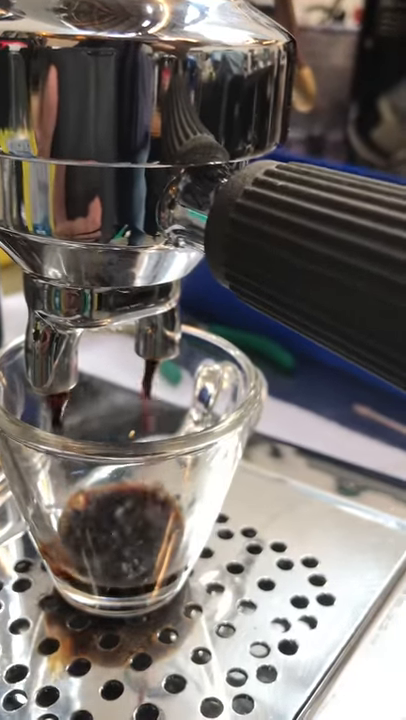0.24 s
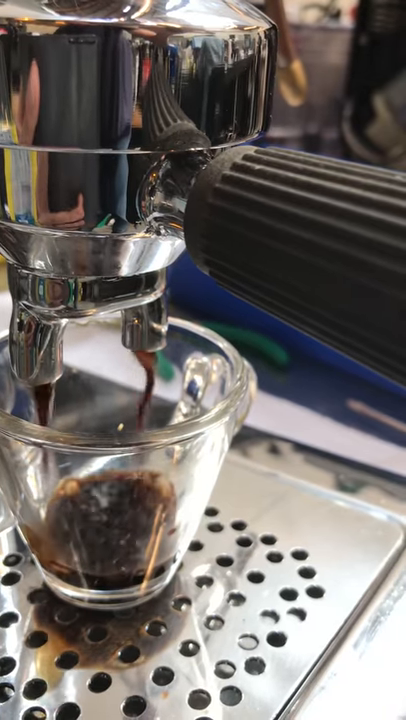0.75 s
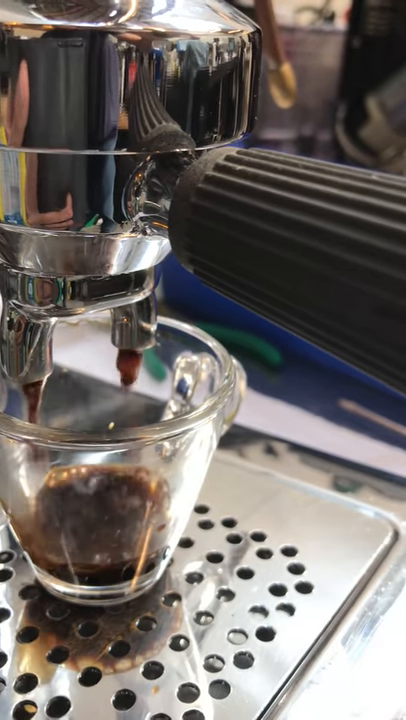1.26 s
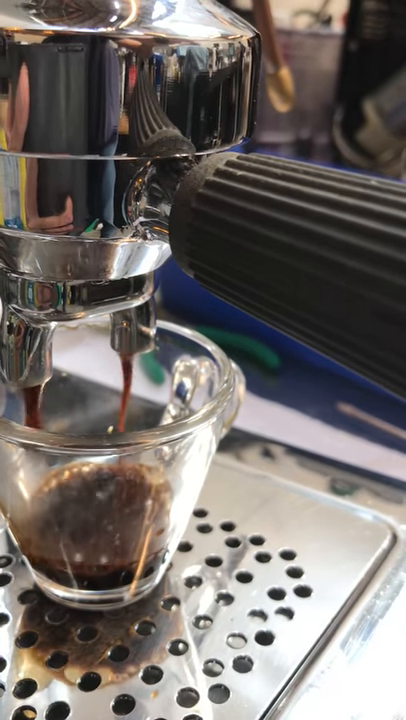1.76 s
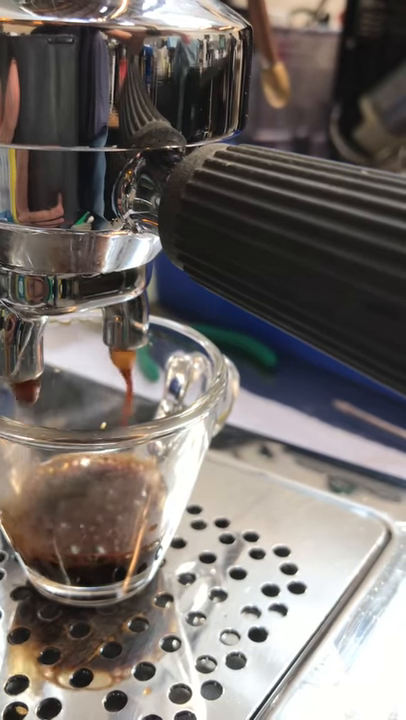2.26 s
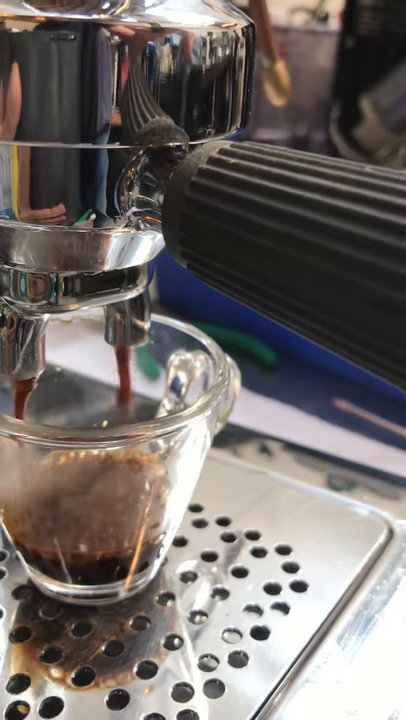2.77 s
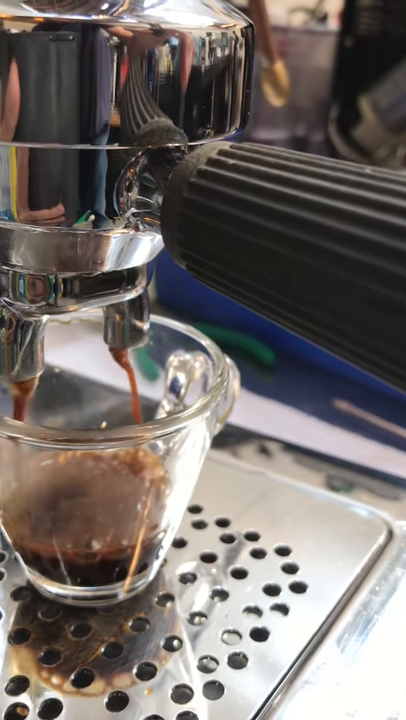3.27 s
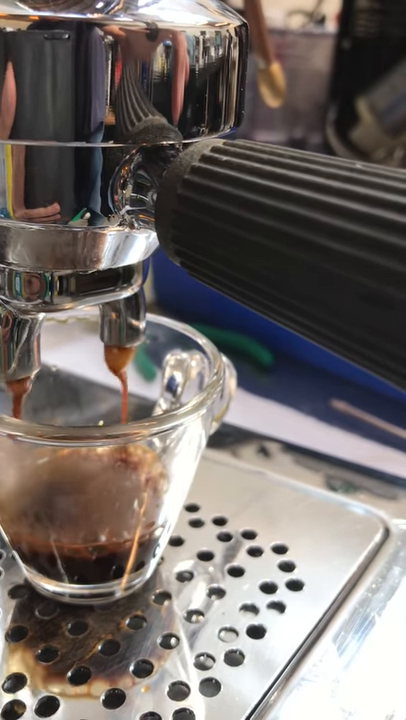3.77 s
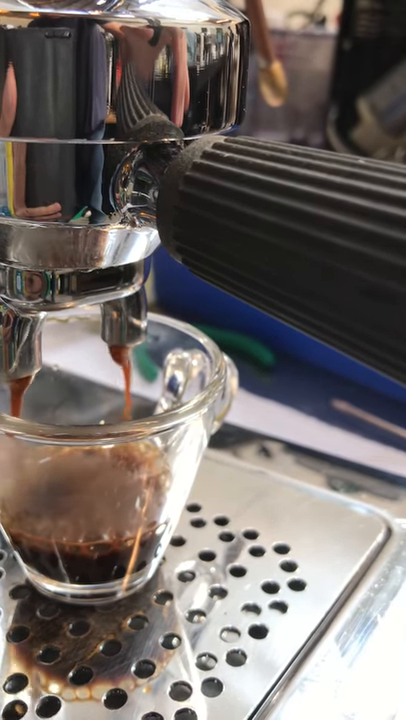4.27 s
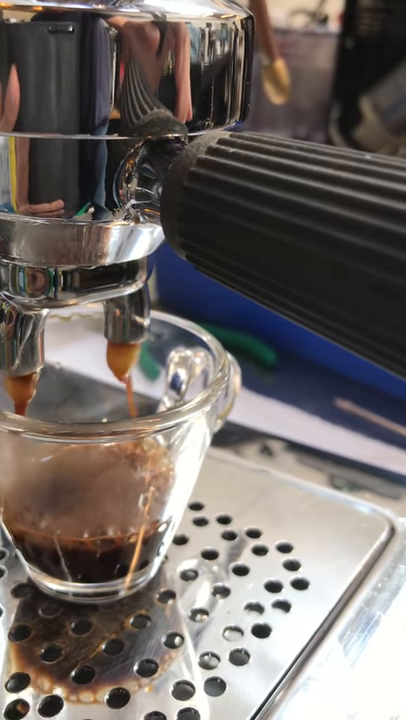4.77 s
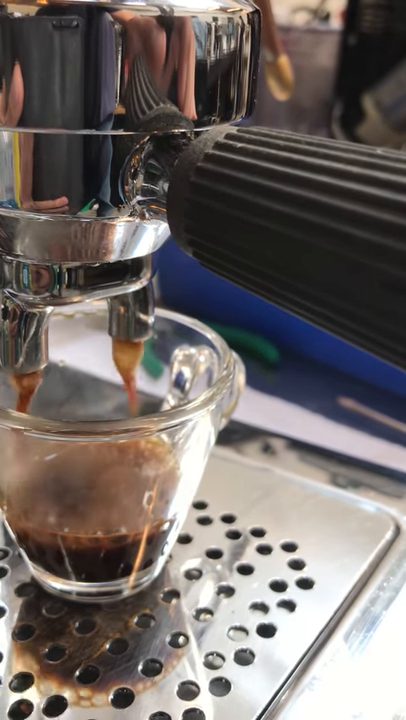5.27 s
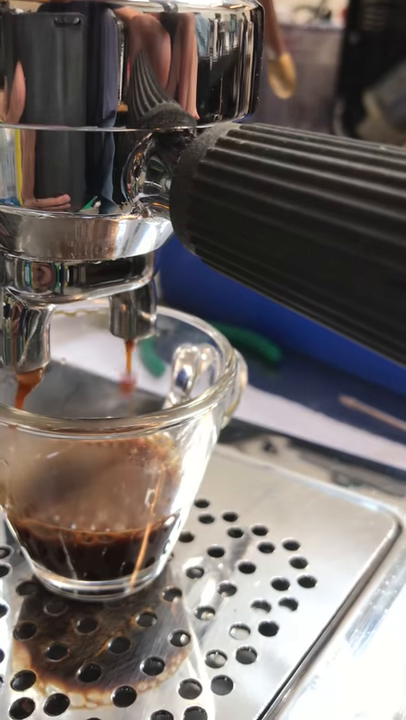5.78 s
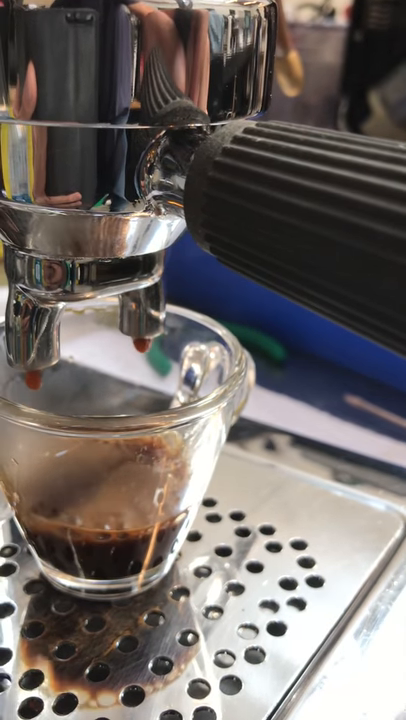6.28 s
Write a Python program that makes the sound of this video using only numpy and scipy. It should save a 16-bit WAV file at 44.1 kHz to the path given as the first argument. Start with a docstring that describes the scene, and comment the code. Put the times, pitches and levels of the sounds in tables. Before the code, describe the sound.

Espresso trickles into a glass cup close to a mono microphone, heard as tiny high pips and ticks of bursting foam bubbles over a soft fizz. The popping runs throughout and is sharpest in the first second and a half. Further off in the workshop, a spray hisses three times in quick succession, at the very start, at about 0.3 and at 0.6 seconds, leaving a thin, fading whistle. At about 1.7 seconds something heavy is knocked down on a bench, a thud with a short metallic ring and a little room echo. The foam sputters softly around 2.5 seconds, gives a clearer pop near 3.2, then slowly calms. A quiet low rumble and machine drone lie underneath, and a faint distant whir swells at about 5 and 6.3 seconds.

```python
"""Bubbles burst in the crema as espresso trickles into a glass cup, close to a mono microphone. Each film
snaps and its cavity rings as a tiny pip or tick; small bubbles crowd around the big ones and the foam
slowly calms. Further off in the workshop a spray hisses three times and something heavy is knocked down
on a bench, ringing its modes. The room rumbles quietly throughout; a faint whir swells twice at the end."""
import sys
import numpy as np
from scipy import signal
from scipy.fft import rfft, irfft, next_fast_len
from scipy.io import wavfile
from scipy.ndimage import map_coordinates

SR = 44100
rng = np.random.default_rng(int(sys.argv[2]) if len(sys.argv) > 2 else 0)


def pcm_store(signal):
    """Save signal as 16-bit PCM."""
    levels = np.round(np.clip(np.atleast_2d(signal), -1, 1) * 32767)
    wavfile.write(sys.argv[1], SR, levels.astype(np.int16).T)


N = 287973
TIME_S = np.arange(N) / SR
TOP_HZ = 16000


def amp(db):
    """Decibels to gain."""
    return 10 ** (np.asarray(db) / 20)


def unit(x):
    """Scale to rms 1."""
    return x / np.sqrt(np.mean(x ** 2) + 1e-20)


def along(points, hz):
    """Read (Hz, value) points on a log frequency axis."""
    knots_hz, values = np.transpose(points)
    return np.interp(np.log(hz + 1), np.log(knots_hz + 1), values)


def wobble(rate_hz):
    """Smooth random curve, rate_hz knots a second."""
    knots = rng.standard_normal(int(N * rate_hz / SR) + 4)
    return map_coordinates(knots, [TIME_S * rate_hz])


def filtered(x, response):
    """Apply a gain given as a function of Hz."""
    size = next_fast_len(N + SR // 2)
    return irfft(rfft(x, size) * response(np.fft.rfftfreq(size, 1 / SR)), size)[:N]


def noise(spectrum):
    """Noise of rms 1 with a (Hz, dB) colour."""
    return unit(filtered(rng.standard_normal(N), lambda hz: amp(along(spectrum, hz))))


def resonant_noise(peaks):
    """Noise of rms 1 through (Hz, width Hz, dB) resonances of alternating sign."""
    def response(hz):
        return sum((-1) ** k * amp(db) * 1j * hz * width / (centre ** 2 - hz ** 2 + 1j * hz * width)
                   for k, (centre, width, db) in enumerate(peaks))
    return unit(filtered(rng.standard_normal(N), response))


def place(start_s, sounds):
    """Sum rows of samples, each from its start time."""
    index = np.round(np.abs(start_s) * SR).astype(int)[:, None] + np.arange(sounds.shape[1])
    return np.bincount(index.ravel(), sounds.ravel(), N)[:N]


def sized(sounds, db):
    """Give each row the energy of 5 ms at its level."""
    energy = np.sum(sounds ** 2, 1, keepdims=True)
    return sounds * amp(db)[:, None] / np.sqrt(energy / (0.005 * SR) + 1e-20)


# Wall reverberation. Each row: frequency in Hz, T60 in seconds.
WALL_DECAY = [(80, 0.89), (300, 0.62), (900, 0.88), (2500, 0.85), (6000, 0.68), (10000, 0.46),
              (16000, 0.43)]

def room(x, wet_db):
    """Add the workshop's tail, 5 ms late; treble dies soonest."""
    hz, t, spectra = signal.stft(rng.standard_normal(SR), SR, nperseg=256)
    decay = amp(-60 * t / along(WALL_DECAY, hz)[:, None])
    tail = signal.istft(spectra * decay, SR, nperseg=256)[1]
    tail = np.pad(tail / np.linalg.norm(tail), (SR // 200, 0))
    return x + amp(wet_db) * signal.fftconvolve(x, tail)[:N]


# Room noise. Each row: frequency in Hz, relative density in dB.
AIR_SPECTRUM = [(12, -26), (20, 3.5), (43, 2.5), (123, 2), (177, -8.5), (222, -6.5), (446, -15),
                (759, -20.5), (923, -20), (1150, -22), (1660, -23), (2820, -28), (4670, -28.5), (5080, -30),
                (16000, -39.5)]
# Machine drone. Each row: centre in Hz, width in Hz, relative gain in dB.
DRONE_PEAKS = [(90.2, 26, -3.5), (131, 31.8, 0.5), (232.6, 30.7, -4), (376, 17, -11.5), (598.7, 14, -15),
               (954, 46, -16), (1326, 8.2, -17), (1440, 4.3, -12), (1720, 6.5, -13)]
# Far whir. Each row: peak time in seconds, level in dB, slope either side in dB per second.
WHIR_SWELLS = [(4.98, -68, 75), (6.35, -65, 130)]

def workshop():
    """Steady room noise, a wavering machine drone and a far whir that swells twice."""
    waver = amp(0.8 * wobble(rate_hz=3))
    swells = sum(amp(db - slope * np.abs(TIME_S - peak_s)) for peak_s, db, slope in WHIR_SWELLS)
    whir = (amp(-79) + swells) * resonant_noise([(915, 86, 0)])
    air = amp(-54.5) * noise(AIR_SPECTRUM)
    drone = amp(-58.5) * waver * resonant_noise(DRONE_PEAKS)
    return air + drone + whir


def pip(t, hz, cycles, glide, linger_db):
    """An opened bubble rings a few cycles, then faintly on, rising in pitch as its cavity shrinks."""
    age_cycles = hz[:, None] * t
    life_cycles = np.maximum(cycles, 1)[:, None]
    rise = glide * rng.uniform(0.8, 1, (len(hz), 1))
    pitch_hz = hz[:, None] * (1 + rise * np.tanh(np.maximum(age_cycles - life_cycles, 0) / 38))
    attack = 1 - np.exp(-(age_cycles / (0.28 * life_cycles)) ** 2)
    fade = np.exp(-(age_cycles / life_cycles) ** 2) + amp(linger_db) * np.exp(-age_cycles / 17)
    return attack * fade * np.sin(2 * np.pi * np.cumsum(pitch_hz, 1) / SR)


# Tearing film. Each row: frequency in Hz, gain in dB.
SNAP_SPECTRUM = [(1500, -28), (3000, -6), (4500, 14.5), (8000, 4), (12000, 1), (16000, -2)]

def bursts(start_s, hz, db, cycles, upper_hz, upper_db):
    """Each film snaps and rings two cavity modes; cup and machine scatter the tones back."""
    t = np.arange(SR // 30) / SR
    linger_db = np.interp(hz, [2500, 4200], [-16, -31])[:, None]  # deep bubbles chirp on longest
    tones = sized(pip(t, hz, 1.3 * cycles, glide=0.7, linger_db=linger_db), db)
    tones += sized(pip(t, upper_hz, 0.92 * cycles, glide=0.09, linger_db=-25), upper_db)
    snap_db = upper_db - 6 + 6 * np.log2(upper_hz / 7500)
    snaps = sized(rng.standard_normal(tones.shape) * t * np.exp(-t / 0.00068), snap_db)
    snaps = filtered(place(start_s, snaps), lambda f: amp(along(SNAP_SPECTRUM, f)))
    scatter = rng.standard_normal(tones.shape) * np.exp(-t / 0.0035) * (t > 0.001)
    scatter /= np.linalg.norm(scatter, axis=1, keepdims=True)
    echoes = signal.fftconvolve(tones, scatter, axes=1)[:, :len(t)]
    return place(start_s, tones + amp(-9) * echoes) + snaps


def small_bursts(start_s, hz, db, cycles):
    """Small bubbles: a weak upper mode at a set ratio above the cavity pitch."""
    upper_hz = np.minimum(1.7 * hz, TOP_HZ)
    return bursts(start_s, hz, db, np.full(len(start_s), cycles), upper_hz, upper_db=db - 16)


def bubble_pairs(activity_db, pairs, centre_hz, log_spread, offset_db, spread_db, cycles):
    """Small bubbles burst in pairs, louder and more often while the foam is busy."""
    due = np.cumsum(amp(activity_db))
    quantiles = (np.arange(pairs) + rng.uniform(0, 1, pairs)) / pairs
    pair_s = np.interp(quantiles, due / due[-1], TIME_S)
    start_s = (pair_s[:, None] + np.cumsum(rng.exponential(0.01, (pairs, 2)), 1)).ravel()
    pitch_draw, level_draw = rng.standard_normal((len(start_s), 2)).T
    hz = np.minimum(centre_hz * np.exp(log_spread * pitch_draw), SR / 3)
    db = np.interp(start_s, TIME_S, activity_db) + offset_db + spread_db * np.tanh(level_draw)
    return small_bursts(start_s, hz, db, cycles)


# Foam activity before stirring. Each row: time in seconds, level in dB.
FOAM_TREND = [(0, -61), (0.8, -56), (1.0, -63), (2.201, -60), (2.7, -60), (3.0, -64), (3.4, -60.5),
              (5.3, -60), (6.5, -66)]

def foam_activity_db(pops, max_stir_db=5, reach_s=0.04, full_kick_db=-50):
    """The foam drifts slowly in level and is stirred up around each big burst."""
    start_s, _, cavity_db = np.transpose(pops)[:3]
    kicks = place(start_s, np.minimum(amp(cavity_db - full_kick_db), 1)[:, None])
    stir = signal.fftconvolve(kicks, signal.windows.gaussian(SR, reach_s * SR), "same")
    return np.interp(TIME_S, *np.transpose(FOAM_TREND)) + max_stir_db * np.tanh(stir)


# Big bubbles. Each row: start in seconds, cavity pitch in Hz, cavity level in dB,
# nominal ring length in cycles, upper mode in Hz, upper mode level in dB.
BIG_POPS = [(0.124, 3900, -39, 6.5, 9710, -55), (0.236, 2860, -37.5, 3.3, 4040, -39),
            (0.306, 4730, -41.5, 3.9, 12400, -47), (0.3306, 2570, -35, 3.6, 3750, -43),
            (0.521, 3600, -41, 1.9, 8000, -63), (0.5706, 4140, -32.5, 4.6, 11700, -52),
            (0.5853, 4370, -32.5, 8.8, 8500, -47), (0.9776, 4420, -46, 5.5, 11410, -54.5),
            (1.0469, 4420, -46, 5.4, 8760, -76), (1.0944, 4400, -68, 4, 8050, -57.5),
            (1.1423, 4260, -38, 5, 5530, -42), (1.2283, 3920, -41, 2.2, 7020, -56),
            (1.3133, 2360, -36, 2.6, 6200, -41.5), (1.3639, 5620, -43.5, 3.7, 9990, -81.5),
            (1.3849, 3740, -49.5, 3.1, 5860, -71), (1.5424, 4360, -43.5, 1.75, 7060, -69),
            (1.635, 3500, -52, 1.3, 6760, -53.5), (1.6548, 4650, -44, 2.1, 7990, -63),
            (1.6913, 2400, -52.5, 2.8, 4100, -53.5), (1.9153, 3540, -54.5, 4.6, 11500, -48),
            (2.1418, 2870, -46.5, 7.1, 4850, -47.5), (2.2707, 5010, -44.5, 6.2, 8000, -43.5),
            (2.3122, 4440, -52, 6, 6780, -78.5), (2.3328, 3900, -52.5, 4.6, 6460, -77),
            (2.5924, 4600, -51, 7.6, 6800, -73), (2.7132, 5830, -51, 3, 8380, -50.5),
            (2.744, 4520, -52.5, 2.8, 8400, -61), (2.7868, 3750, -55, 4.7, 6460, -61.5),
            (2.8008, 4760, -69.5, 5.3, 8600, -52), (2.823, 4340, -48.5, 7, 6440, -73),
            (2.875, 4470, -76.5, 4.2, 6800, -62), (2.9558, 4100, -46.5, 1.8, 6800, -55),
            (3.1176, 3980, -46.5, 2.5, 8700, -60.5), (3.158, 4370, -72, 4, 11200, -59),
            (3.2121, 4400, -38, 4.1, 11100, -53), (3.2326, 3960, -50.5, 4.5, 5730, -65),
            (3.2385, 4700, -45.5, 4.1, 7960, -46.5), (3.3819, 4460, -47.5, 2.1, 7210, -65),
            (3.4649, 6160, -52.5, 4.6, 8200, -58), (3.5285, 4450, -48, 4.7, 6900, -58),
            (3.7516, 4230, -60, 9.4, 10800, -61.5), (4.1411, 4170, -57.5, 3.9, 7710, -60.5),
            (4.3013, 2980, -55.5, 3.7, 6700, -51.5), (4.5423, 2300, -71, 7.9, 11930, -60.5),
            (4.565, 2200, -48.5, 2.6, 7100, -60), (4.9447, 4770, -49.5, 4.1, 7600, -51.5),
            (5.2215, 4660, -48, 6.1, 6300, -58.5), (5.4337, 4270, -67, 3.7, 6930, -60),
            (5.5956, 4350, -47.5, 5.5, 7650, -55.5), (5.6959, 4710, -45, 5.2, 7280, -68),
            (6.2904, 3270, -58, 3.3, 7700, -52.5)]

def crema():
    """Foam in the cup: clear pops, bubble runs, small pips, finer ticks and a soft fizz."""
    activity_db = foam_activity_db(BIG_POPS)
    pips = bubble_pairs(activity_db, pairs=120, centre_hz=4350, log_spread=0.12,
                        offset_db=-7, spread_db=5.5, cycles=4.5)
    ticks = bubble_pairs(activity_db, pairs=160, centre_hz=7900, log_spread=0.27,
                         offset_db=-11, spread_db=5, cycles=3.2)
    fizz = noise([(1500, 0.5), (4300, -8), (8000, -11), (10500, -21), (16000, -15)])
    pops = bursts(*np.transpose(BIG_POPS))
    return room(pops + bubble_runs() + pips + ticks, wet_db=-22) + amp(activity_db - 9.5) * fizz


# Spray flow. Each row: start, rise, hold and fall T60 in seconds, level in dB.
SQUIRTS = [(0.02, 0.05, 0.018, 0.18, -37.5), (0.326, 0.055, 0.015, 0.2, -42.5),
           (0.551, 0.035, 0.037, 0.24, -35)]
# Mist hiss. Each row: frequency in Hz, relative density in dB.
MIST_SPECTRUM = [(710, -46), (1200, -21), (1630, -18.5), (2270, -9.5), (2480, -6), (3620, -3.5), (3950, 3),
                 (4960, -4), (6030, 0.5), (7490, -9), (8630, 1.5), (10500, -0.5), (11300, -4), (15200, -7),
                 (16000, -16)]
# Nozzle and whistle resonances. Each row: centre in Hz, width in Hz, relative gain in dB.
NOZZLE_PEAKS = [(2330, 160, 3), (3890, 270, -2), (6020, 130, 3), (8380, 120, 4.5), (8660, 120, -3),
                (9250, 150, -6)]
WHISTLE_PEAKS = [(2520, 320, -4.5), (6310, 130, 4), (12600, 420, -7)]

def spray(whistle_db=-58, whistle_hold_s=0.35, whistle_fall_db_per_s=38):
    """Each squirt swells, holds and dies; a thin whistle carries on and the hiss lingers in the room."""
    flow = np.zeros(N)
    for start_s, rise_s, hold_s, t60_s, db in SQUIRTS:
        t = TIME_S - start_s
        attack = np.clip(t / rise_s, 0, 1) ** 1.1
        flow += attack * amp(db - 60 * np.maximum(t - rise_s - hold_s, 0) / t60_s)
    fall_db = whistle_fall_db_per_s * np.maximum(TIME_S - whistle_hold_s, 0)
    whistle = amp(whistle_db - fall_db) * resonant_noise(WHISTLE_PEAKS)
    hiss = noise(MIST_SPECTRUM) + amp(-12.5) * resonant_noise(NOZZLE_PEAKS)
    return room(flow * hiss, wet_db=-1) + whistle


# Blows on the bench. Each row: start in seconds, relative level in dB, contact time in seconds.
BLOWS = [(1.7313, -10, 0.0002), (1.7365, 3.5, 0.00086), (1.7434, -3, 0.00074)]
# Bench and the metal things on it. Each row: frequency in Hz, relative level in dB, T60 in seconds.
BENCH_MODES = [(95, -10, 0.31), (142, -20, 0.16), (219, -16.5, 0.47), (250.6, 2.5, 0.061),
               (292, 2.5, 0.088), (479, -9, 0.31), (554, -0.5, 0.035), (598, -7, 0.041), (644, 5, 0.31),
               (700, -27, 0.053), (760, -6, 0.045), (747, -10, 0.13), (874, -6, 0.18), (1170, -29, 0.17),
               (1220, -17, .18), (1510, -13, 0.16), (1500, 2.5, 0.039), (2860, -9, 0.093),
               (3120, -15, 0.17), (3980, -6, 0.22), (4040, -9.5, 0.32)]
# Impact noise. Each row: frequency in Hz, relative density in dB.
THUD_SPECTRUM = [(24, -44), (40, -12), (95, -4.5), (182, -11), (284, 0), (329, -11.5), (643, -10.5),
                 (845, -14.5), (933, -16), (1350, -17), (1460, -20), (3220, -33), (4030, -33),
                 (15000, -52.5)]

def knock(thud_rise_s=0.0036, thud_t60_s=0.19):
    """A heavy thing lands in three quick contacts; longer contacts stir only the bench's low modes."""
    t = np.arange(SR) / SR
    hz, mode_db, t60_s = np.transpose(BENCH_MODES)[:, :, None]
    polarity = (-1) ** np.arange(len(hz))[:, None]  # neighbouring modes push the air opposite ways
    modes = polarity * amp(-60 * t / t60_s) * np.sin(2 * np.pi * hz * t)
    rings = []
    for _, db, contact_s in BLOWS:
        strength = amp(db + mode_db + rng.normal(0, 1, hz.shape)) / (1 + (2 * hz * contact_s) ** 2)
        rings.append(np.sum(strength * modes, 0))
    start_s = np.transpose(BLOWS)[0]
    ring = place(start_s, np.array(rings))
    age_s = np.maximum(TIME_S - start_s[0], 0)
    thud = noise(THUD_SPECTRUM) * (1 - np.exp(-age_s / thud_rise_s)) * amp(-60 * age_s / thud_t60_s)
    return room(amp(-21) * ring, wet_db=-11.5) + room(amp(-22.6) * thud, wet_db=-2)


# Bubble runs. Each row: start in seconds, starting pitch in Hz, starting level in dB.
BUBBLE_RUNS = [(2.148, 3320, -54.5), (5.685, 4430, -62.5)]

def bubble_runs(count=10, gap_s=0.013, rise_octaves_per_s=5.5, fade_db_per_s=97):
    """After a drop lands, ever smaller bubbles burst in a chain that climbs in pitch and fades."""
    start_s, first_hz, first_db = np.transpose(BUBBLE_RUNS)[:, :, None]
    shape = (len(BUBBLE_RUNS), count)
    age_s = gap_s * (np.arange(count) + rng.uniform(0, 0.58, shape))
    db = first_db - fade_db_per_s * age_s + rng.normal(0, 2, shape)
    hz = first_hz * 2 ** (rise_octaves_per_s * age_s + rng.normal(0, 0.053, shape))
    return small_bursts((start_s + age_s).ravel(), hz.ravel(), db.ravel(), cycles=8.3)


def sputter(centre_s=2.52, half_width_s=0.064, level_db=-63.5):
    """The foam sputters once: a brief, soft swell of deeper fizz."""
    swell = np.exp(-((TIME_S - centre_s) / half_width_s) ** 2)
    fizz = noise([(1000, -25), (2600, 2), (6000, -5), (9000, -15), (16000, -30)])
    return amp(level_db) * swell * fizz


def scene():
    """One microphone feeds both channels."""
    mono = crema() + sputter() + spray() + knock() + workshop()
    return np.array([mono, mono])


# Microphone port notch. Each row: frequency in Hz, gain in dB.
MIC_RESPONSE = [(9600, -0.5), (10450, -4.5), (11400, 0.5), (16000, -3.5)]

def record(dry):
    """The recorder cuts the deepest rumble, colours the treble and passes nothing above TOP_HZ."""
    low_cut = signal.butter(8, 28, "highpass", fs=SR, output="sos")
    response = lambda hz: amp(along(MIC_RESPONSE, hz)) * (hz < TOP_HZ)
    return np.array([filtered(channel, response) for channel in signal.sosfilt(low_cut, dry)])


dry = scene()
out = record(dry)
pcm_store(out)
```